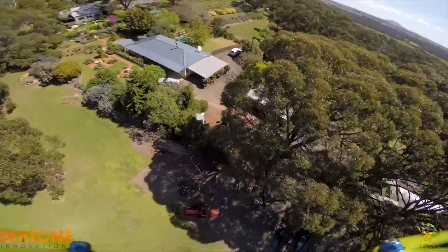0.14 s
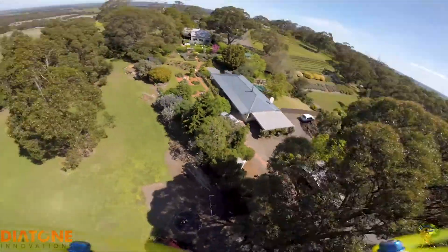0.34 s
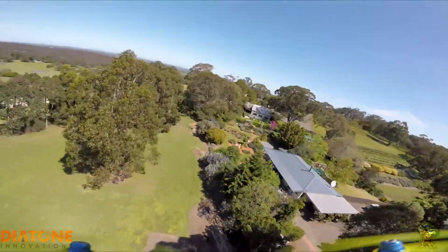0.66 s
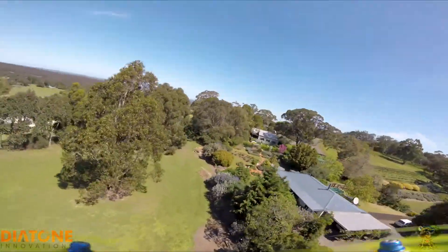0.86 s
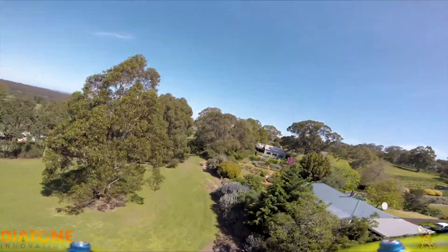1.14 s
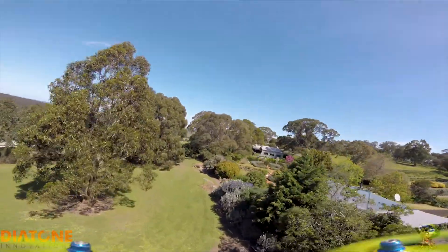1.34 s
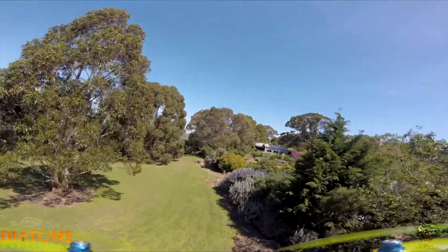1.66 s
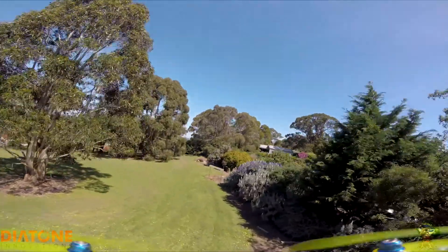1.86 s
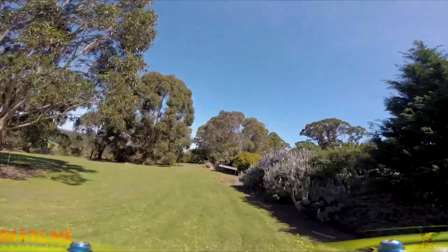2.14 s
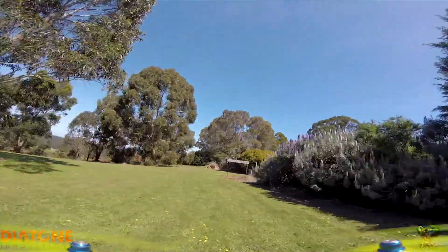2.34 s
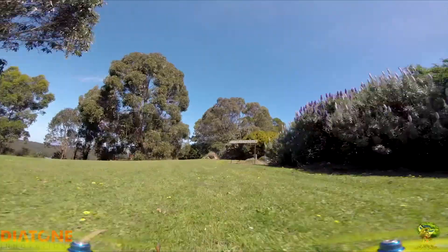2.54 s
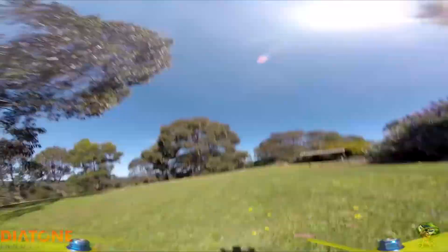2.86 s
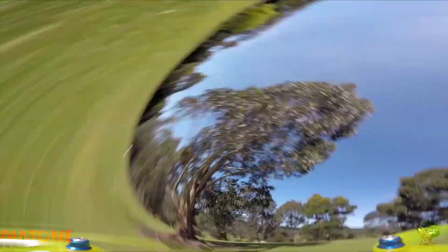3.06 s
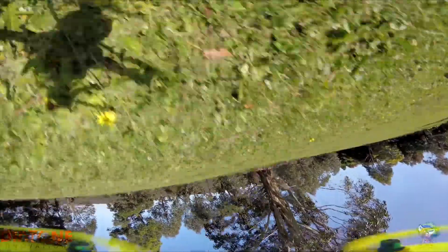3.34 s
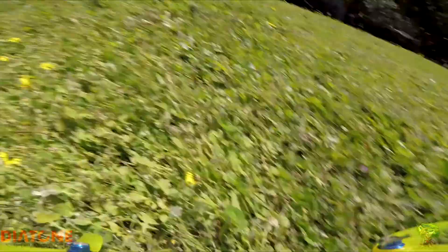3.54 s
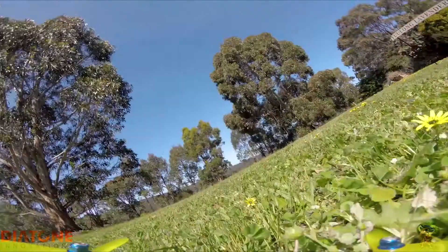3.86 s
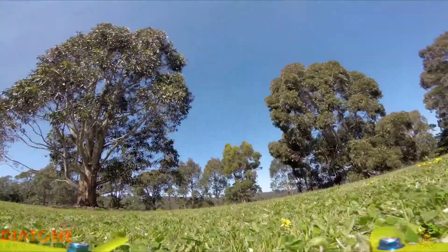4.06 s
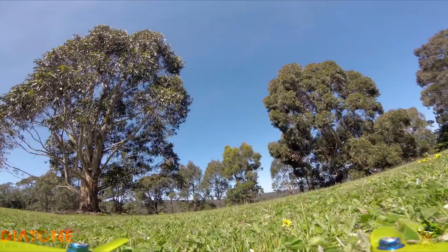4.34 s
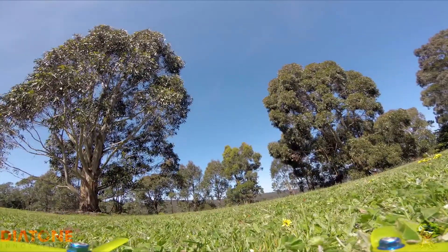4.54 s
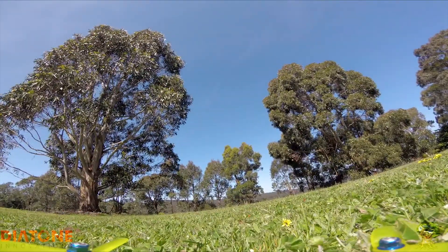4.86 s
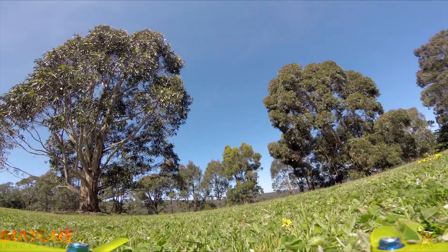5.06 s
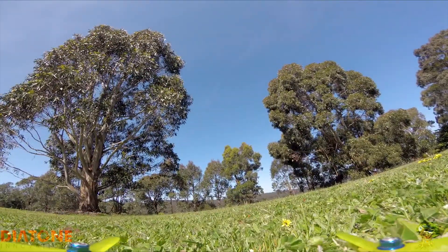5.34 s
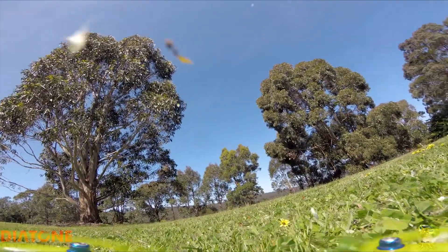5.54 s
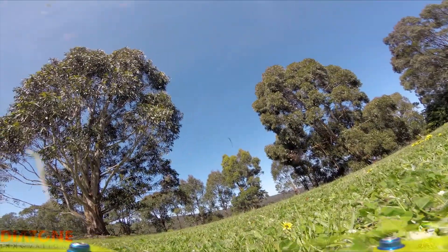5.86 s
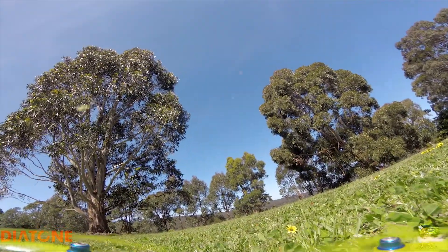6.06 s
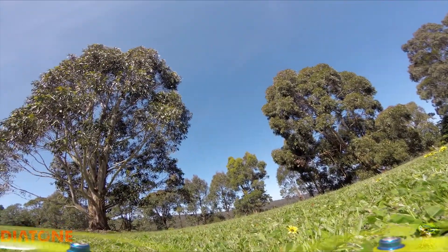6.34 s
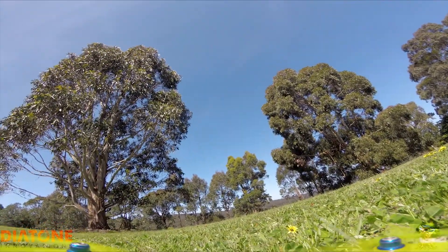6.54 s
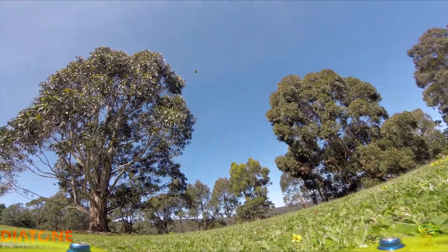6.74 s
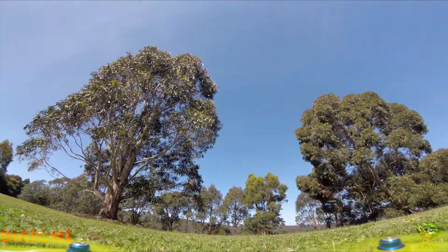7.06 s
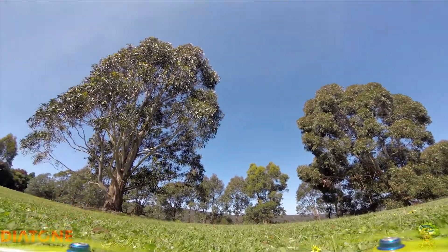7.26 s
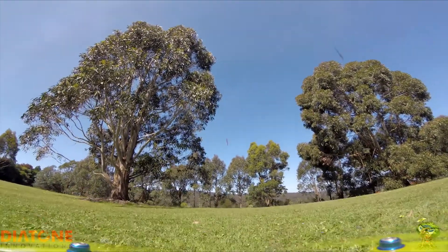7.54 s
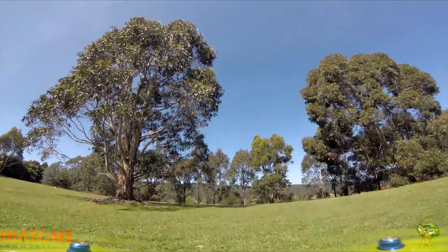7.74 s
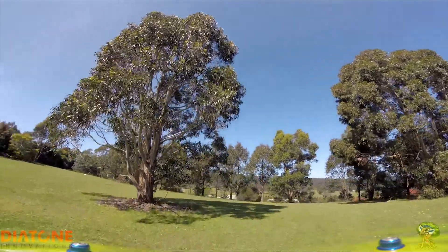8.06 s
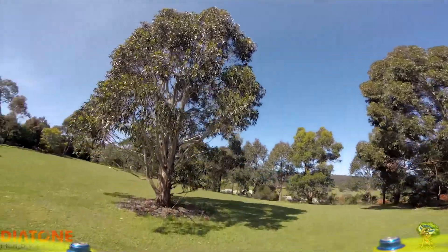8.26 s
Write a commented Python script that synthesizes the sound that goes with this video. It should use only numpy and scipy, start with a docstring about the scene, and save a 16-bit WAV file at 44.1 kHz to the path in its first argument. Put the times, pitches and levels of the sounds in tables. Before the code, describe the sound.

Close, dry microphone on a racing drone, no echo. Four slightly different motor tones swing and beat over rumbling wind. The drone hits a lawn, flips with jerky motor snarls and heavy thuds, then coasts to silence. After more than a second of almost nothing, the blades burst back, knocking and thrashing grass, with a hoarse growl and uneven shaking; the tone smooths and climbs as it lifts, then sinks.

```python
"""A racing quadcopter heard from its own frame: four three-bladed propellers whine over wind and propeller wash.
It flips and tumbles into a lawn; its motors buzz at idle and fall silent, leaving a faint background.
They restart, thrash the grass and lift it off again, one bent propeller shaking the frame.
Blade-pass phase drives tones, pulsed noise and overtones; struck modes and noise bursts make the knocks."""
import sys
import numpy as np
from scipy import signal
from scipy.fft import rfft, irfft
from scipy.io import wavfile
from scipy.ndimage import uniform_filter1d

SR = 44100
rng = np.random.default_rng(int(sys.argv[2]) if len(sys.argv) > 2 else 0)


def to_wav(s):
    """Save 16-bit WAV."""
    ch = np.atleast_2d(s).T  # columns
    pcm = np.round(np.clip(ch, -1, 1) * 32767)  # PCM
    wavfile.write(sys.argv[1], SR, pcm.astype(np.int16))


N = 370440
TIME = np.arange(N) / SR

# the first strike ends the flight; the flips end; the motors fall silent on the lawn and start again
STRIKE_S, FLIPS_END_S, STOP_S, RESTART_S = 2.657, 3.42, 4.13, 5.385

# how deep the propellers sit in the grass: time_s, share (0-1)
GRASS_DEPTH = [(5.345, 0.03), (5.39, 0.83), (5.9, 0.94), (6.4, 0.87), (6.65, 0.41), (7.1, 0.09),
               (7.4, 0.04)]
# how rough the air is that the propellers bite into: time_s, turbulence (0-1)
TURBULENCE = [(0, 0.97), (1.0, 0.79), (1.35, 0.6), (1.8, 0.78), (2.0, 0.66), (2.25, 0.3), (2.6, 0.28),
              (2.75, 0.54), (3.05, 0.3), (3.45, 0.37), (5.4, 0.84), (7.1, 0.57), (7.7, 0.03), (8.0, 0.1),
              (8.4, 0.73)]
# relative spectrum of the propeller wash: frequency_hz, level_db
WASH_SPECTRUM = [(100, -9), (230, 2), (420, 11.5), (680, 6), (900, 0), (1500, -1.5), (2200, -9.5),
                 (3000, -15.5), (4500, -18.5), (9000, -42.5)]
# relative spectrum of the blade-tip hiss: frequency_hz, level_db
HISS_SPECTRUM = [(1500, -10), (2800, 2), (3700, -5.5), (4600, -3), (4900, 2), (5400, 1), (6500, -0.5),
                 (8000, -5), (10000, -15), (12000, -26), (15000, -35.5)]


def undb(db):
    """Decibels to amplitude: 20 dB is a factor of ten."""
    return np.exp(np.asarray(db) * (np.log(10) / 20))


def curves(table):
    """Linear interpolation in time of each column of a table."""
    s, *columns = np.transpose(table)
    return [np.interp(TIME, s, c) for c in columns]


def unit(x):
    """Normalisation to rms 1."""
    return x / np.sqrt(np.mean(x ** 2))


def colour(x, points):
    """Spectral shaping by (Hz, dB) points, with roll-offs at both ends."""
    hz, db = np.transpose(points)
    f = np.maximum(np.fft.rfftfreq(N, 1 / SR), 1)
    fade = 1 / (1 + (f / hz[-1]) ** 4) / (1 + (hz[0] / f / 2) ** 2)
    response = fade * undb(np.interp(np.log(f), np.log(hz), db))
    return irfft(rfft(x) * response, N)


def noise(points, gate=1):
    """Amplitude-modulated white noise, then coloured and brought to rms 1."""
    return unit(colour(gate * rng.standard_normal(N), points))


def walk(rate):
    """Slow random modulation: levels held 1 / rate s and smoothed twice; spread 1."""
    k = max(int(SR / rate), 2)
    held = np.repeat(rng.standard_normal(N // k + 1), k)
    return unit(uniform_filter1d(uniform_filter1d(held, k), k)[:N])


def after(s):
    """A smooth step from 0 to 1 at time s, so that one stage quickly gives way to the next."""
    change_s = 0.0046
    return .5 + .5 * np.tanh((TIME - s) / change_s)


def by_speed(hz, db, knee_hz, steepness):
    """Power-law radiation: gain grows as a power of blade speed and levels off above a knee."""
    return undb(db) / (1 + (knee_hz / hz) ** steepness)


def per_motor(table):
    """The columns of a table with one row for each motor, ready to spread over time."""
    return np.transpose(table)[:, :, None]


def roughness():
    """Turbulence of the inflow over time, 0 to 1."""
    return np.clip(curves(TURBULENCE)[0], 0, 1)


def grass_share():
    """Immersion of the propellers in the grass over time, 0 to 1."""
    return np.clip(curves(GRASS_DEPTH)[0], 0, 1)


def four_speeds(lead, bent, balanced, hunt=.035):
    """Beating of near-equal tones: in calm air the fourth motor pairs with the lead; in rough air it hunts."""
    pair_ratio = 1.02
    rough = roughness()
    # around the mean speed of the others
    hunting = (lead + bent + balanced) / 3 * (1 + hunt * walk(6))
    fourth = rough * hunting + (1 - rough) * pair_ratio * lead
    return np.array([lead, bent, balanced, fourth])


def flight():
    """Rotor noise in flight: tones follow the swinging speeds, wash and hiss follow the blade load."""
    # swoop to the lawn: time_s, lead_hz, bent_hz, balanced_hz (nominal blade-pass rates), relative load_db
    swoop = [(0, 221.2, 165.2, 145.3, -38.5), (.3, 212.4, 150, 159.9, -40), (.45, 480, 355, 385, -36.5),
             (.56, 618, 416, 524, -33.5), (.8, 709, 456.5, 596, -35.5), (1.12, 624, 481.8, 539.5, -36.5),
             (1.38, 531.5, 408.5, 410, -41.5), (1.63, 485, 398, 355.2, -44.5),
             (1.76, 547, 427.3, 348, -40.5), (1.9, 570, 478.8, 392.7, -41),
             (1.99, 618, 448.2, 414.4, -36.5), (2.08, 812, 459, 441.7, -39),
             (2.2, 789.5, 481, 457.4, -37.5), (2.32, 712, 469, 443.7, -37), (2.4, 592, 410, 435.3, -39.5),
             (2.47, 570.8, 381.2, 404.4, -39), (2.53, 598, 441.4, 410.4, -38),
             (2.6, 731.7, 532.4, 462.6, -38), (2.64, 741, 551, 469, -38)]
    # effort, the slower three easing off just before the strike: time_s, lead_tone_db, slower_tones_db, shake_db
    effort = [(.2, -3, -1, -7), (.45, -4.5, -1, 6.5), (.75, 0, -3.5, 5), (1.1, 1.5, -3.5, -11),
              (1.65, 1, 3, -8), (1.95, 0, 0, 0.5), (2.1, -2, 4.5, 5.5), (2.33, 0, 0.5, 8.5),
              (2.39, 0, -5, 4), (2.44, 6, -31, -3), (2.51, -1.5, -15, -17.5), (2.55, 2.5, 1.5, 2),
              (2.64, 3.5, 3, 5)]
    # lead, bent, balanced and fourth motor before effort is added: blade_tone_db, shaft_shake_db
    motor_levels = [(-33.5, -47.5), (-33.5, -46.5), (-36.5, -57), (-46.5, -51)]
    hiss_against_load_db, hiss_knee_hz = -13, 243
    lead, bent, balanced, load_db = curves(swoop)
    lead_db, slower_db, shaking_db = curves(effort)
    tone_db, shake_db = per_motor(motor_levels)
    tone_db = tone_db + np.array([lead_db, slower_db, slower_db, slower_db])
    hiss = by_speed(lead, load_db + hiss_against_load_db, hiss_knee_hz, 2.0)
    speeds = four_speeds(lead, bent, balanced)
    return speeds, undb(tone_db), undb(shake_db + shaking_db), undb(load_db), hiss


def through_frame(hz):
    """Structural transmission: how well the frame passes a motor tone of this frequency to the microphone."""
    # gain of the frame: frequency_hz, level_db
    frame_response = [(100, -5.5), (150, 4.5), (210, 0.5), (330, -3), (460, -0.5), (620, -2.5), (800, -5),
                      (1200, 4.5)]
    points_hz, db = np.transpose(frame_response)
    return undb(np.interp(np.log(hz), np.log(points_hz), db))


def motor(blade_hz, tone_gain, shake_gain, flutter_db=3.1, skirt=0.65, wobble_db=-27):
    """Blade-pass tone and imbalance: three pulses and one shake per turn. Returns sound and blade phase."""
    octave_db, octave_knee_hz, octave_top_hz, octave_blur_rad = -6.5, 545, 2350, .75
    rough = roughness()
    # the flight controller nudges the speed, more so in rough air
    nudges = (0.003034 + 0.00895 * rough) * walk(30) + .002 * walk(170)
    speed = blade_hz * (1 + nudges)
    blade = 2 * np.pi * (np.cumsum(speed) / SR + rng.random())
    shaft = blade / 3
    # eddies vary the load on the blades and spread the tone into a noisy skirt
    eddies = skirt * rough * (np.sin(blade) * walk(230) + np.cos(blade) * walk(230))
    # a fast blade adds an octave, strongest in calm air
    octave_gain = (1 - 0.76 * rough) * by_speed(blade_hz, octave_db + 3.9 * walk(70), octave_knee_hz, 3.2)
    octave_gain = octave_gain / (1 + (2 * blade_hz / octave_top_hz) ** 8)
    octave = octave_gain * np.sin(2 * blade + octave_blur_rad * walk(110))
    whine = np.sin(blade) * undb(flutter_db * walk(45)) + eddies + octave
    wobble = undb(wobble_db + 2 * walk(38)) * np.sin(2 * shaft)
    shake = np.sin(shaft) * undb(2.1 * walk(30)) + wobble
    tone_gain = tone_gain * through_frame(blade_hz)
    shake_gain = shake_gain * through_frame(blade_hz / 3)
    return np.sqrt(2) * (tone_gain * whine + shake_gain * shake), blade


def propellers(speeds, tones, shakes):
    """Superposition: four motors at different speeds beat together. Returns sound and blade phases."""
    motors = [motor(*settings) for settings in zip(speeds, tones, shakes)]
    return sum(m[0] for m in motors), [m[1] for m in motors]


def rasp(blade, onset_hz=570, steepness=6):
    """Harmonics of a sharp pulse: above a certain tip speed each blade throws a row of flickering overtones."""
    # relative spectrum of the rasp through the casing: frequency_hz, level_db
    rasp_spectrum = [(1000, -3), (1400, 6), (2200, 1.5), (2500, -1), (2850, 1.5), (3500, -0.5), (3950, -4),
                     (4300, -3), (4850, 2), (5700, -6.5), (6400, -8.5)]
    # its upper continuation: frequency_hz, level_db
    rasp_treble = [(8000, -11), (10000, -16), (13000, -31)]
    hz = np.gradient(blade) * SR / (2 * np.pi)
    # flexing blades arrive a little early or late, which blurs the high overtones most
    tip = blade + .085 * walk(150) + .32 * walk(30)
    # the overtones swell and fade in three unrelated groups
    flicker = [undb(3.5 * walk(70)) for _ in range(3)]
    comb = sum(np.cos(k * tip + rng.uniform(0, 2 * np.pi)) * flicker[k % 3] for k in range(3, 15))
    # unequal blades put weaker lines between the overtones
    uneven = 1 + .55 * np.cos(blade / 3)
    return unit(colour(comb * uneven, rasp_spectrum + rasp_treble)) / (1 + (onset_hz / hz) ** steepness)


def air(blades, wash_gain, hiss_gain, chop=0.91):
    """Modulated turbulence noise: wash and tip hiss pulse with every blade; grass replaces the wash."""
    # share of the rasp from the lead, bent, balanced and fourth motor: weight
    rasp_shares = [1, .55, .2, .6]
    calm_wash_db = -3.5  # smooth air makes less wash
    grass = grass_share()
    calm = 1 - roughness()
    # the lead propeller weighs most
    pulses = [w * (1 + np.clip(chop, 0, 1) * np.cos(b)) ** 4 for w, b in zip([2.5, 1.9, 0.44, 0.22], blades)]
    gate = np.sqrt(sum(pulses))
    wash = noise(WASH_SPECTRUM, gate) * undb(3.5 + calm_wash_db * calm + 1.2 * walk(40))
    stems = thrash(blades) * undb(6.5 + 1.4 * walk(50))
    # calm air keeps the tip pulses regular; rough air smears them into hiss
    hiss = noise(HISS_SPECTRUM, gate) * undb(-2.8 * calm + .9 * walk(45))
    tips = (.1 + 1.7 * calm) * sum(share * rasp(blade) for share, blade in zip(rasp_shares, blades))
    wash_or_stems = np.sqrt(1 - grass) * wash + np.sqrt(grass) * stems
    return wash_gain * wash_or_stems + hiss_gain * (hiss + tips)


def buffeting(gust_db=1.5):
    """Pressure fluctuations of wind on the microphone, lower in pitch after the strike; flips add a rumble."""
    # relative spectrum of the wind: frequency_hz, level_db
    wind_spectrum = [(15, -14), (30, -2), (65, 2.5), (110, 2.5), (170, -2.5), (260, -11.5), (450, -30),
                     (1000, -40)]
    # wind level before gusts: time_s, level_db
    airflow = [(0, -29), (.6, -27.5), (2.2, -28), (2.45, -42.5), (2.62, -33), (2.69, -44), (2.8, -44.5),
               (3.2, -38), (3.33, -48), (3.41, -47), (3.45, -58), (4.04, -67.5), (4.35, -74), (5.33, -61.5),
               (5.39, -39), (6.25, -45.5), (6.65, -30), (7.5, -31), (7.8, -50), (8.4, -34.5)]
    slow_pitch, flip_rumble_db = 0.87, -44.5  # at low airspeed the spectrum shifts down by this factor
    slow = after(STRIKE_S)
    slow_spectrum = [(hz * slow_pitch, db) for hz, db in wind_spectrum]
    eddies = (1 - slow) * noise(wind_spectrum) + slow * noise(slow_spectrum)
    # air rolls over the microphone while the frame spins
    spinning = slow - after(FLIPS_END_S)
    rumble = spinning * undb(flip_rumble_db) * noise([(18, -4.5), (30, -4), (50, -5)])
    return eddies * undb(curves(airflow)[0] + gust_db * walk(14)) + rumble


def knocks(snap_s=0.007, attack_s=0.00068, detune=0.012):
    """Impact and modal decay: a blow thumps and rings the frame, crushes grass and, if hard, snaps a blade."""
    # blows: start_s, thump_hz, thump_db, thump_s (rise), crunch_db, crunch_s (decay), snap_db, ring_db
    blows = [(2.633, 92.8, -20, 0.003, -21, 0.015, -41, -49),
             (2.645, 257, -20, 0.0091, -41, .008, -57, -46),
             (3.354, 150.5, -21.5, 0.016, -34, 0.018, -57, -58),
             (3.366, 232.6, -18, 0.0067, -30, .012, -51, -48),
             (3.369, 59.7, -25, 0.011, -32, 0.0072, -47, -35),
             (3.684, 42.2, -31.5, 0.027, -49, 0.03, -88, -68),
             (3.736, 127.7, -34, 0.0078, -52, 0.0095, -83, -73),
             (3.778, 70, -31.5, 0.011, -52, .030, -83, -65),
             (3.797, 56.8, -25.5, 0.01, -56, 0.021, -89, -75),
             (3.834, 110, -42, 0.013, -49, 0.01, -90, -65),
             (5.16, 109.4, -53, 0.0077, -64, 0.023, -98, -84),
             (5.344, 270, -29, 0.012, -26, 0.015, -57, -29.5),
             (5.368, 57.5, -27, 0.023, -33, 0.02, -68, -33),
             (5.388, 200.5, -26, 0.0074, -30, 0.04, -52, -24),
             (5.412, 330.3, -30, 0.0082, -34, 0.013, -48, -25),
             (5.421, 382, -24, 0.0063, -24, .01, -51, -27), (5.446, 260, -25, 0.0065, -24, .008, -43, -22),
             (5.479, 350, -21, 0.0047, -27, 0.0092, -58, -35),
             (5.506, 199.4, -26, 0.0059, -32, .008, -55, -27),
             (5.527, 219.6, -18, 0.0058, -39, 0.0077, -57, -25.5),
             (5.576, 294.6, -28, 0.0076, -30, .008, -56, -23)]
    # modes of the struck frame: nominal frequency_hz, relative level_db, t60_s
    frame_modes = [(349, -9.5, 0.033), (575, -2.5, 0.028), (700, -3.5, .04), (1028, -10, 0.086),
                   (1280, -4.5, 0.03), (1565, -8.5, 0.03), (1860, -9.5, 0.02), (2060, -10.5, 0.065),
                   (2350, -11.5, 0.025), (2810, -17.5, .03)]
    # relative spectrum of crushed grass: frequency_hz, level_db
    crunch_spectrum = [(40, 10), (150, 5), (320, 9.5), (600, -3.5), (1300, -14), (2200, -41), (3000, -36.5),
                       (8000, -38)]
    out, crunch = np.zeros(N), noise(crunch_spectrum)
    snap = noise([(800, -19.0), (2000, -11.0), (5000, 0.5), (10000, -10.5), (13000, -29)])
    mode_hz, mode_db, t60 = np.transpose(frame_modes)[:, :, None]
    for s, hz, thump_db, thump_s, crunch_db, crunch_s, snap_db, ring_db in blows:
        span = slice(int(s * SR), int(s * SR) + SR // 2)
        t = TIME[span] - TIME[span][0]
        thump = np.sin(2 * np.pi * hz * t) * (t / thump_s) ** 2 * np.exp(2 - 2 * t / thump_s)
        grit = undb(crunch_db) * crunch[span] * np.exp(-t / crunch_s)
        grit = grit + undb(snap_db) * snap[span] * np.exp(-t / snap_s)
        # every blow lands on another spot, so the ring is never quite the same
        shift, phase = rng.uniform(-1.27, 1, (2, len(mode_hz), 1))
        waves = np.sin(2 * np.pi * mode_hz * (1 + detune * shift) * t + np.pi * phase)
        modes = undb(mode_db) * waves * np.exp(-np.log(1000) * t / t60)
        attack = 1 - np.exp(-t / attack_s)
        out[span] += undb(thump_db) * thump + (grit + undb(ring_db) * modes.sum(axis=0)) * attack
    return out


def tumble():
    """First-order rotor inertia: propellers chase each burst of throttle and coast to idle; levels follow speed."""
    # the controller fights the tumble: start_s, length_s, lead_hz, bent_hz (commanded), tone_db, wash_db, hiss_db
    bursts = [(2.6, 0.15, 930, 201, -7.5, -3.5, -12), (2.725, 0.079, 680, 658, -3.5, 3, 7.5),
              (2.806, 0.044, 440, 419, 16.5, 5.5, 6.5), (2.849, 0.069, 630, 472, -10, 0, 1),
              (2.913, 0.14, 866, 260, 3, 0.5, 0), (3.053, 0.045, 1440, 948, -2.5, 7.5, 5),
              (3.1, 0.036, 630, 558, 6, 1, 0), (3.136, .043, 1460, 1325, -2.5, 2, 12.5),
              (3.179, 0.18, 260, 290, 5.5, 4, 3.5), (3.392, 0.056, 1450, 903, -8.5, -14, -4),
              (3.96, 0.09, 160, 160, 7, 21, 0)]
    # lead, bent, balanced and fourth motor, full levels before the bursts' accents: blade_tone_db, shaft_shake_db
    motor_levels = [(-37, -35.5), (-39, -42.5), (-44.5, -44.5), (-45, -40)]
    idle_hz, spin_lag_s = 151.7, .05
    # shares of the bent and the lead motor's bursts that the other two follow
    balanced_surge, fourth_surge = .6, .9
    hiss_settle_s = .3  # decay of the tip hiss once the flips are over
    # growth with speed: level before accents (dB), knee (Hz), steepness
    tone_growth, wash_growth, hiss_growth = (0, 646, 2.84), (-47.5, 361, 7.9), (-42.5, 1013, 3.47)
    command = np.zeros((5, N))
    for start, length, lead_hz, bent_hz, *levels_db in bursts:
        span = slice(int(start * SR), int((start + length) * SR))
        command[:, span] = np.array([lead_hz - idle_hz, bent_hz - idle_hz, *levels_db])[:, None]
    keep = np.exp(-1 / (spin_lag_s * SR))
    lead, bent, accent_db, wash_db, hiss_db = signal.lfilter([1 - keep], [1, -keep], command)
    tone_db, shake_db = per_motor(motor_levels)
    hz = idle_hz + np.abs([lead, bent, balanced_surge * bent, fourth_surge * lead])
    running = 1 - after(STOP_S)
    drive = running * undb(accent_db) * by_speed(hz, *tone_growth)
    stirring = running * np.exp(-np.maximum(TIME - FLIPS_END_S, 0) / hiss_settle_s)
    wash = undb(wash_db) * by_speed(hz[0], *wash_growth)
    hiss = undb(hiss_db) * by_speed(hz[0], *hiss_growth)
    return hz, drive * undb(tone_db), drive * undb(shake_db), running * wash, stirring * hiss


def idle(blades):
    """Phase-blurred harmonics: coasting and idling in the grass, the motors buzz unevenly until they stop."""
    # level of the buzz before its unevenness: time_s, level_db
    buzz_level = [(3.5, -58), (3.6, -77), (3.9, -79), (4.01, -71), (4.13, -88)]
    # relative spectrum of the buzz: frequency_hz, level_db
    buzz_spectrum = [(280, 5), (600, -16.5), (850, -32), (1060, -19), (1500, -31)]
    lines = sum(np.sin(k * blade + 1.8 * walk(70)) for blade in blades[:2] for k in range(2, 11))
    uneven_db = 2.5 * walk(35)
    idling = after(FLIPS_END_S) - after(STOP_S)
    return unit(colour(lines, buzz_spectrum)) * undb(curves(buzz_level)[0] + uneven_db) * idling


def lawn():
    """Stationary background noise, very faint, that swells while the motors are silent and then holds."""
    low_db, hiss_db, swell_db_per_s = -103, -108, 19  # both levels hold before the swell
    swell_db = swell_db_per_s * (np.clip(TIME, STOP_S, RESTART_S) - STOP_S)
    return undb(swell_db) * (undb(low_db) * noise(WASH_SPECTRUM) + undb(hiss_db) * noise(HISS_SPECTRUM))


def lift_off():
    """Drag and imbalance: grass slows the balanced motor until they climb clear; the bent one shakes the frame."""
    # out of the grass and up: time_s, lead_hz, bent_hz (nominal blade-pass rates), bent_shake_db, relative load_db
    climb = [(5.39, 385, 369.6, -32.5, -41.5), (5.56, 328, 424.5, -33.5, -44.5),
             (5.68, 332, 400, -26.5, -43), (5.82, 345, 400, -30, -42.5), (5.95, 310, 354.9, -29.5, -45.5),
             (6.12, 275, 319.6, -28.5, -46.5), (6.42, 295, 274.7, -30, -42),
             (6.61, 520, 421.2, -27.5, -38.5), (6.8, 480, 412.9, -33, -42.5),
             (7.08, 425, 389.9, -32, -40.5), (7.2, 500, 487.4, -34, -39.5), (7.35, 585, 544.9, -29, -41),
             (7.62, 677, 587.7, -26, -44), (7.92, 722, 628, -25.5, -46), (8.07, 626.5, 565, -26.5, -42),
             (8.2, 428, 436.2, -33, -40), (8.3, 288, 337.3, -33, -44.5), (8.4, 241, 284.5, -44, -41.5)]
    # lead, bent, balanced and fourth motor: tone_in_grass_db, tone_in_free_air_db, shake_against_bent_db
    motor_levels = [(-35.5, -29, -7), (-39, -34, 0), (-36, -41, -22), (-33.5, -35.5, -32)]
    tone_knee_hz = 455  # in free air the blade tones fade below this speed
    # the balanced motor's speed against the bent one; the share of it that full grass takes away
    balanced_share, grass_drag = .93, .38
    grass_wash_db, hiss_db, hiss_knee_hz, hiss_rise_s = 9, 3, 428, 0.13  # levels against the load
    clear_s, hiss_fall_db_per_s = 7.907, 33  # once clear of the lawn, the hiss thins
    lead, bent, bent_db, load_db = curves(climb)
    grass = grass_share()
    grass_db, free_db, shake_db = per_motor(motor_levels)
    hz = four_speeds(lead, bent, bent * balanced_share * (1 - grass_drag * grass))
    tone = grass ** 2 * undb(grass_db) + (1 - grass) ** 2 * by_speed(hz, free_db, tone_knee_hz, 3.01)
    thinning_db = hiss_fall_db_per_s * np.maximum(TIME - clear_s, 0)
    build_up = 1 - np.exp(-np.abs(TIME - RESTART_S) / hiss_rise_s)
    hiss = by_speed(bent, load_db + hiss_db - thinning_db, hiss_knee_hz, 1.4) * build_up
    return hz, tone, undb(bent_db + shake_db), undb(load_db + grass_wash_db * grass), hiss


def thrash(blades, scatter_db=-3.0, swish=0.06, snap_fade_s=0.49):
    """Impulse excitation: the lowest blade of each propeller slaps grass once a turn; motors grind under load."""
    # relative spectrum of struck grass: frequency_hz, level_db
    grass_spectrum = [(60, -16), (170, 30.5), (320, 18), (450, -7), (560, 3), (700, 6), (900, -9),
                      (1300, 9.5), (1700, 8), (2350, 0), (2650, -15.5), (3600, -21), (5100, -26.5),
                      (6000, -12.5), (7000, -27), (7900, -13), (9000, -33)]
    push = swish * rng.standard_normal(N)
    for weight, blade in zip([0.55, 0.69, 0.19, 0.058], blades):
        turns = np.floor(blade / (6 * np.pi))
        slaps = np.diff(turns, prepend=turns[0])
        push = push + weight * slaps * undb(scatter_db * rng.standard_normal(N))
    # standing stems snap loudly until they are mown down: about 260 snaps a second
    standing = np.exp(-np.abs(TIME - GRASS_DEPTH[1][0]) / snap_fade_s)
    snaps = (rng.random(N) < 260 / SR) * rng.uniform(-2.5, 2.5, N)
    push = push * (1 - .5 * standing) + standing * snaps
    return unit(colour(push, grass_spectrum)) + labour(blades)


def labour(blades):
    """Shaft-order noise: motors held back by grass grind at high multiples of shaft speed, in wavering lines."""
    # relative level of the lead, bent and balanced motor: level_db
    motor_levels_db = [-1, 2, -6]
    labour_db, peak_s, width_s = -10.5, 5.776, 0.26  # level against the slapped grass
    jolt_rad = 1.1  # the stems jolt the shafts and smear the lines
    coil_count, coil_db = 12, -8.5  # the bent motor's coils keep one line clearer
    lines = sum(undb(motor_db + 2 * walk(80)) * np.sin(order * blade / 3 + jolt_rad * walk(110))
                for motor_db, blade in zip(motor_levels_db, blades) for order in range(10, 19))
    coil_line = unit(np.sin(coil_count * blades[1] / 3 + .5 * walk(90)))
    coils = undb(coil_db + 2 * walk(50)) * coil_line
    strain = np.exp(-((TIME - peak_s) / width_s) ** 2)
    return undb(labour_db) * (unit(lines) + coils) * strain


def growl(blade):
    """Random amplitude and phase modulation: breaking free of the stems, the lead propeller gives a hoarse tone."""
    peak_s, width_s, tone_db, octave_db = 5.46, 0.073, -32.5, -33.5
    tone, octave = (np.sin(k * blade + .6 * walk(130)) * undb(3 * walk(110)) for k in (1, 2))
    return (undb(tone_db) * tone + undb(octave_db) * octave) * np.exp(-((TIME - peak_s) / width_s) ** 2)


def controls():
    """Crossfade of flight, tumble and lift-off: speeds, then gains of tones, shakes, wash and hiss."""
    struck, restarted = after(STRIKE_S), after(RESTART_S)
    return [(1 - struck) * a + (struck - restarted) * b + restarted * c
            for a, b, c in zip(flight(), tumble(), lift_off())]


def scene():
    """Near-field superposition: sources and microphone share one frame, so there is no distance and no echo."""
    speeds, tones, shakes, wash, hiss = controls()
    whine, blades = propellers(speeds, tones, shakes)
    motors = whine + air(blades, wash, hiss) + idle(blades) + growl(blades[0])
    return (motors + buffeting() + knocks() + lawn())[None]


def record(dry):
    """Soft saturation rounds off the loudest peaks; an elliptic low-pass filter then cuts the top."""
    ceiling, top_hz = .17, 14900  # ceiling as an amplitude ahead of the filter
    held = dry / (1 + (dry / ceiling) ** 6) ** (1 / 6)
    return signal.sosfilt(signal.ellip(8, .2, 70, top_hz, fs=SR, output="sos"), held)


dry = scene()
out = record(dry)
to_wav(out)
```